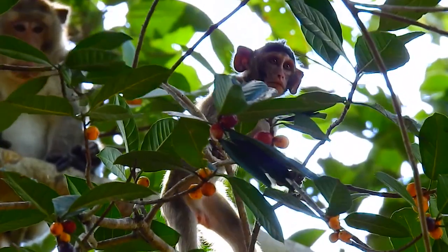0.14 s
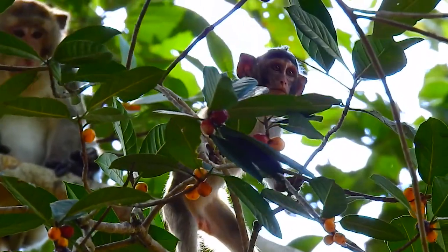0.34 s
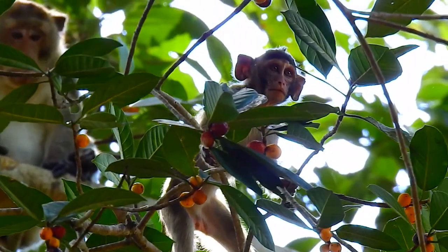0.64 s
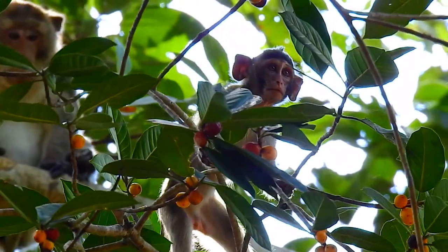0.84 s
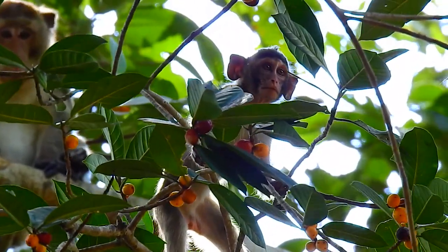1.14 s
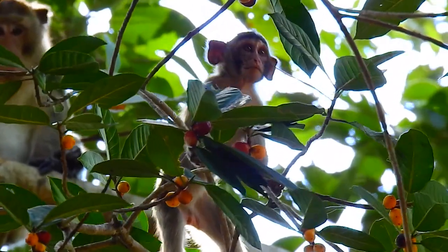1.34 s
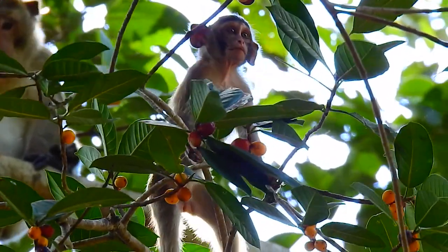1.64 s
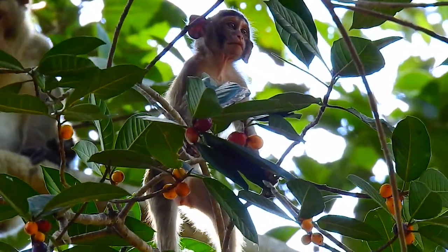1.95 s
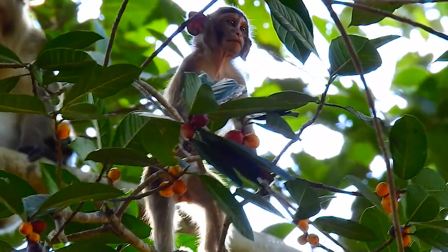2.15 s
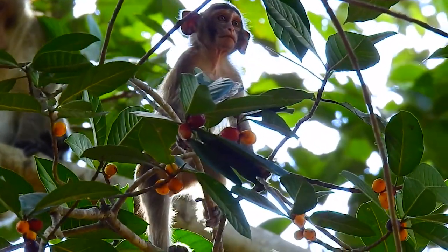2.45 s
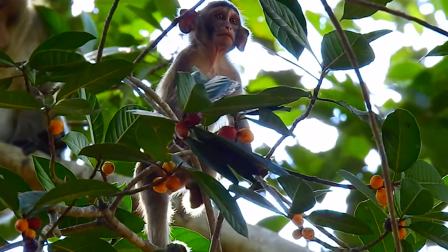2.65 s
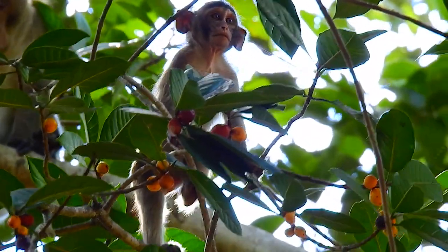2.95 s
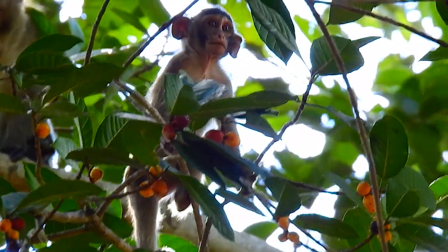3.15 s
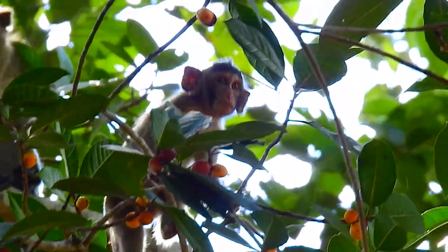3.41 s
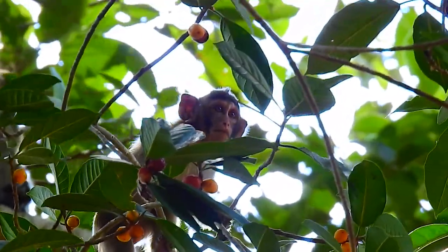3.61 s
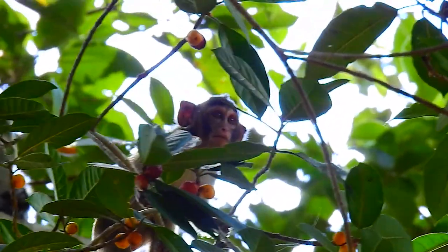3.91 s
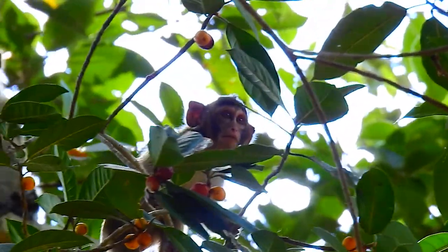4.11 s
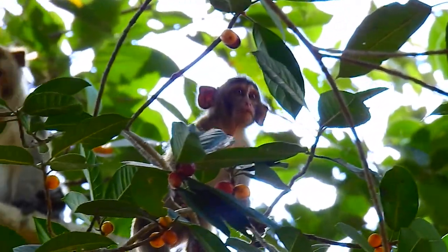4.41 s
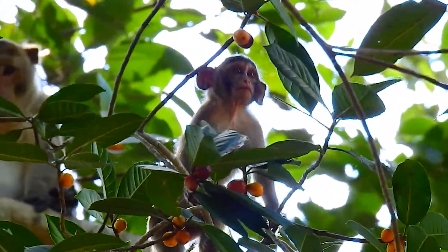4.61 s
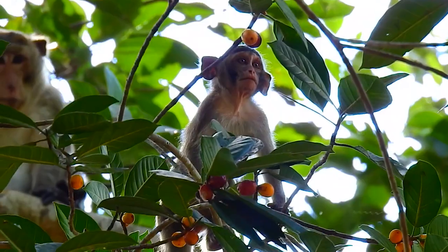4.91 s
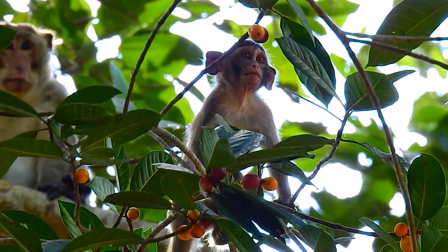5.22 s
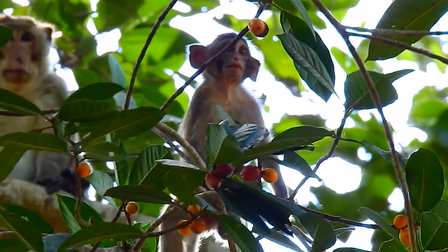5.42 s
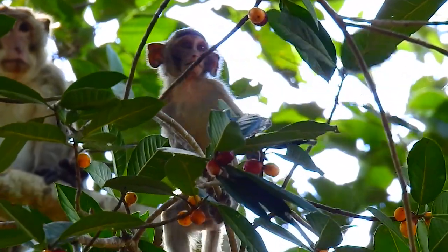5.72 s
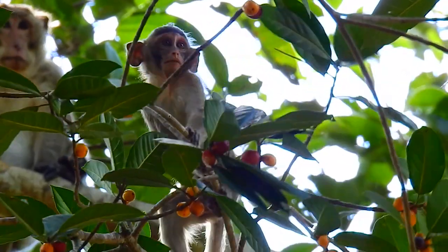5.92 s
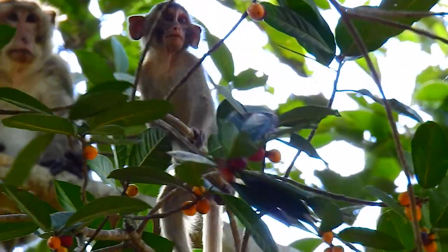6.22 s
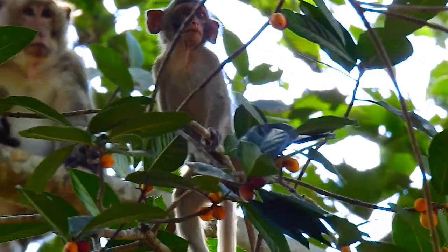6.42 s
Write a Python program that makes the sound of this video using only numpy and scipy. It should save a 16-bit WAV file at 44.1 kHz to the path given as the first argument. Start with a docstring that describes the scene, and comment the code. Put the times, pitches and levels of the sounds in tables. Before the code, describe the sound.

Several cicadas drone loudly and without pause in a forest, a shrill fluttering whine around seven to eight kilohertz, smeared by echoes and slightly left. Beneath lie a soft low rumble, leafy hiss and faint rustling. Small woody knocks scatter throughout, sharpest near two and a half seconds, with tiny falling insect chips, a few low thuds and one faint distant toot. Wide stereo outdoor pickup, with no voices.

```python
"""Four cicadas drone in a forest, loudest at the fifth harmonic of click rates near 1.5 kHz. Three warble
about 13 times a second, a fainter fourth at 19 as it swells; pitches climb and dense echoes smear the song.
Filtered noise makes the rumble, leafy hiss and soft rustling below; noise through a resonance makes a faint hum.
Gliding sines make thin insect chips and faint chirps; noise bursts set wood knocking and clicks set off low
thuds. One distant toot is a stack of harmonics."""
import sys
import numpy as np
from scipy import signal
from scipy.fft import rfft, irfft, next_fast_len
from scipy.io import wavfile

SR = 44100
rng = np.random.default_rng(int(sys.argv[2]) if len(sys.argv) > 2 else 0)


def dump_mix(stems):
    """Bounce the given channels to the path in sys.argv[1] as a 16-bit WAV at rate SR."""
    frames = np.atleast_2d(stems).T  # one column per channel
    limited = np.clip(frames, -1, 1)  # hard clip at full scale
    pcm = np.round(limited * 32767).astype(np.int16)
    wavfile.write(sys.argv[1], SR, pcm)


N = 289296  # length in samples

# Harmonics each cicada body radiates, relative levels: harmonic_number, level_db
NEAR_BODY = [(4, -19), (5, -1), (6, -32), (7, -45), (8, -50)]
LOWER_BODY = [(4, -27), (5, -1), (6, -32), (7, -54), (8, -35)]
FAR_BODY = [(4, -25), (5, 6), (6, -44), (7, -41)]
# Click rates of the near, lower, upper and swelling cicada: first_hz, climb_hz_per_s, slowing_hz_per_s2
CLICK_RATES = [(1485.5, 7.3, 0.19), (1427, 4.7, 0), (1516, 1.8, 0), (1497, 0.4, 0)]
# Loudness of two cicadas over time: time_s, level_db
NEAR_LEVEL = [(0, -23), (1.5, -23.5), (2, -22), (3, -25.5), (6.56, -24.5)]
UPPER_LEVEL = [(0, -32.5), (1, -33.5), (2, -31.5), (3, -36), (6, -36), (6.56, -26)]
LOWER_DB = -33
# The fourth cicada rises steadily, passing this level at this time
SWELL_TIME_S, SWELL_DB, SWELL_RISE_DB_PER_S = 2.23, -52.5, 5.0
LEAN_DB = 1.5  # cicadas, left minus right

# Relative noise colours of rumble, hiss and rustling: frequency_hz, density_db_per_hz
RUMBLE_COLOUR = [(12, -51), (20, -20), (46, -6), (69, 2.5), (128, -2), (186, -6), (259, -18.5),
                 (445, -21.5), (550, -24), (633, -19.5), (729, -26.5), (922, -22.5), (1340, -28.5),
                 (3960, -29), (5500, -25.5), (7150, -67), (12100, -120)]
HISS_COLOUR = [(4500, -30), (5600, -2), (6600, -1.5), (7900, -2), (8400, -15.5), (9000, 0.5), (10000, -4.5),
               (12000, -5), (13200, -9), (14300, -26)]
RUSTLE_COLOUR = [(180, -14), (300, -9.5), (600, 5.5), (1000, -4.5), (1600, -2), (2600, -28), (6000, -60)]
RUMBLE_DB, HISS_DB = -41, -51.5
# Stereo width of the noise: frequency_hz, side_minus_mid_db
NOISE_WIDTH = [(60, -16.5), (110, -15), (200, -8.5), (370, -7), (670, -8.5), (1230, -13), (2250, -11),
               (4120, -6), (7530, -0.5), (13800, 6.5)]
# Loudness of the rustling over time: time_s, level_db
RUSTLE_LEVEL = [(0, -54.5), (.3, -59.5), (1.2, -62), (1.7, -56.5), (2.6, -65), (3.8, -66), (4.3, -59),
                (5.1, -70), (5.55, -58), (6.2, -61), (6.56, -73)]

HUM_HZ, HUM_DB = 886, -65.5

# Falling insect chips, levels before echoes: time_s, level_db
CHIPS = [(0.0594, -38), (0.1894, -40), (0.6744, -46), (0.9707, -41), (1.0685, -44), (1.3119, -43),
         (1.5494, -39), (1.799, -44), (2.6155, -43), (2.819, -40), (3.3408, -45), (3.5617, -41),
         (3.7843, -44), (4.7366, -44), (5.2829, -41), (5.661, -42), (6.1861, -43)]
# Faint far chirps, levels before echoes: start_s, length_s, first_hz, last_hz, level_db
CHIRPS = [(1.485, .03, 3400, 3380, -53), (1.52, 0.028, 3380, 3480, -47.5), (3.61, 0.011, 3260, 2880, -44),
          (3.645, 0.028, 2960, 3160, -48), (3.897, 0.0089, 3200, 2900, -45)]

# Wooden knocks, last two relative to level_db: start_s, level_db, pitch_hz, crack_db, lowest_ring_db
KNOCKS = [(0.549, -42, 804, -6, -10), (0.764, -42.5, 960, -6, -16), (0.778, -41, 912, 2, -2),
          (0.829, -47, 880, 1, -13), (1.141, -41, 1046, 2, -11), (1.154, -45.5, 794, -6, -17),
          (1.293, -52, 1110, 1, 9), (1.318, -41, 814, -20, -14), (1.384, -47, 834, -5, -13),
          (1.788, -49.5, 870, 8, 3), (2.274, -38.5, 1357, 3.5, -22), (2.359, -46, 814, -11, -6),
          (2.438, -49, 723, -6, 5), (2.465, -27.5, 1047, -11, -20), (2.924, -43, 920, -11, -1),
          (3.232, -50, 1080, 7, -5), (4.239, -47, 877, 6, -5), (4.706, -40, 990, -22, 3),
          (4.941, -49.5, 1090, 8, -1), (5.48, -36, 1050, 3, -9), (5.587, -42, 873, -13, -15),
          (5.786, -48, 1040, 5, -9), (5.812, -38.5, 784, -3, -15), (5.832, -40, 700, -2, -22),
          (5.841, -42, 710, 0, -20), (6.159, -49.5, 1110, 9.5, 7)]
# Upper rings of the wood, relative to the knock: pitch_multiple, level_db, t60_s
WOOD_RINGS = [(1.002, 0.5, 0.076), (1.25, -8.5, 0.046), (2.05, -29, 0.035)]
# Lowest, hollow ring of the wood: pitch_multiple, t60_s
HOLLOW_RING = (0.584, 0.11)
CONTACT_RISE_S, BLOW_T60_S, CRACK_T60_S = 0.0035, 0.025, 0.077
# Low thuds: start_s, level_db, pitch_hz, t60_s
THUDS = [(1.419, -43, 202.7, 0.44), (2.923, -37, 207.6, 0.43), (4.705, -32, 199.8, 0.43)]

TOOT_S, TOOT_ATTACK_S, TOOT_HOLD_S = 2.35, 0.04, 0.17
TOOT_DB, TOOT_ROOT_DB, TOOT_FADE_DB_PER_S = -52, -4, 24  # root: its fundamental, relative
TOOT_HZ, TOOT_TAIL_HZ = 443, 446.5
# Its resonance: centre at first, centre in the tail, width
TOOT_LOUDEST_HZ, TOOT_TAIL_LOUDEST_HZ, TOOT_WIDTH_HZ = 3680, 3400, 480

CUTOFF_HZ = 14400


def from_db(db):
    """Turn decibels into an amplitude factor."""
    return 10 ** (np.asarray(db) / 20)


def rms_one(x):
    """Scale a signal to an RMS of 1."""
    return x / np.sqrt(np.mean(x ** 2) + 1e-20)


def level_over_time(rows):
    """Draw straight lines in dB between (time_s, level_db) points."""
    time_s, level_db = np.transpose(rows)
    return np.interp(np.arange(N) / SR, time_s, level_db)


def at_hz(points, hz):
    """Read a dB curve along a logarithmic frequency axis."""
    points = np.array(points)
    return np.interp(np.log(hz + 1), np.log(points[:, 0] + 1), points[:, 1])


def drift(rate_hz):
    """Slow random wander of RMS 1: noise through two equal low-pass poles, one value per 40 samples."""
    step = 40
    pole = np.exp(-2 * np.pi * rate_hz * step / SR)
    noise = rng.standard_normal(N // step + 2002)
    slow = signal.lfilter([1], [1, -2 * pole, pole ** 2], noise)[2000:]  # skip the filter's start-up
    return np.interp(np.arange(N) / step, np.arange(len(slow)), rms_one(slow))


def ring(excitation, hz, t60):
    """Two-pole resonance: a unit click starts a sine of height 1 that falls 60 dB in t60 seconds."""
    radius = from_db(-60 / (t60 * SR))
    angle = 2 * np.pi * hz / SR
    feedback = [1, -2 * radius * np.cos(angle), radius ** 2]
    return signal.lfilter([0, np.sin(angle)], feedback, excitation + 1e-18)


def harmonics(hz, body):
    """Sum sines at whole multiples of a moving pitch."""
    phase = 2 * np.pi * np.cumsum(hz) / SR
    return sum(from_db(db) * np.sin(round(number) * phase) for number, db in body)


def forest(x, direct_db, t60, alike, lag_s):
    """Direct sound plus dense decaying echoes, partly shared by both sides; expected power is kept."""
    t = np.arange(SR) / SR
    shared, left, right = rng.standard_normal((3, SR))
    alike = np.clip(alike, 0, 1)
    echoes = np.sqrt(alike) * shared + np.sqrt(1 - alike) * np.array([left, right])
    echoes *= from_db(-60 * t / t60)
    echoes /= np.sqrt(np.sum(echoes ** 2, axis=1, keepdims=True))
    echoes[:, 0] = from_db(direct_db)
    size = next_fast_len(len(x) + SR)
    hz = np.fft.rfftfreq(size, 1 / SR)
    # A positive lag delays left by half and advances right by half
    lag = np.exp(-1j * np.pi * hz * lag_s * np.array([[1], [-1]]))
    out = irfft(rfft(x, size) * rfft(echoes, size) * lag, size)
    return out[:, len(x) - N:len(x)] / np.sqrt(1 + from_db(2 * direct_db))


def cicada(hz, db, body, warble_hz, start, depth, skew, unsteady, **place):
    """Body harmonics of a click rate that warbles to and fro and wanders slightly."""
    warble_rate = warble_hz * (1 + unsteady * drift(1.456))
    phase = 2 * np.pi * (start + np.cumsum(warble_rate) / SR)
    warble = np.sin(phase) + skew * np.sin(2 * phase)
    hz = hz * (1 + depth * warble + 0.000308 * drift(6.8))
    # Six earlier warbles fill the forest with echoes before the scene opens
    earlier = round(6 * SR / warble_hz)
    tone = rms_one(harmonics(np.r_[hz[:earlier], hz], body))
    return from_db(db) * forest(tone, **place)


def chorus():
    """Four cicadas with their own echo blends, leaning left; all climb in pitch and the fourth swells."""
    t = np.arange(N) / SR
    near_hz, lower_hz, upper_hz, swelling_hz = [
        first + climb * t - slowing * t ** 2 for first, climb, slowing in CLICK_RATES]
    swelling_db = SWELL_DB + SWELL_RISE_DB_PER_S * (t - SWELL_TIME_S)
    near = cicada(near_hz, level_over_time(NEAR_LEVEL), NEAR_BODY,
                  warble_hz=12.7, start=0.284, depth=0.0064, skew=0.17, unsteady=0.021,
                  direct_db=-6.0, t60=1.0, alike=0.067, lag_s=1.2e-5)
    lower = cicada(lower_hz, LOWER_DB, LOWER_BODY,
                   warble_hz=12.6, start=0.282, depth=0.0075, skew=0.34, unsteady=0.0343,
                   direct_db=-8.5, t60=1.0, alike=0.078, lag_s=-2.4e-5)
    upper = cicada(upper_hz, level_over_time(UPPER_LEVEL), FAR_BODY,
                   warble_hz=12.2, start=0.591, depth=0.0053, skew=0.031, unsteady=0.033,
                   direct_db=-5.5, t60=1.0, alike=0.035, lag_s=0)
    swelling = cicada(swelling_hz, swelling_db, FAR_BODY,
                      warble_hz=19.0, start=0.1, depth=0.0067, skew=0.11, unsteady=0.0264,
                      direct_db=-36, t60=0.44, alike=0.043, lag_s=0)
    lean = from_db(LEAN_DB / 2 * np.array([[1], [-1]]))
    return (near + lower + upper + swelling) * lean


def air(colour, patchy_db):
    """Coloured stereo noise whose half-octave bands swell and sink, partly together."""
    hz = np.fft.rfftfreq(N, 1 / SR)
    mid, side = rfft(rng.standard_normal((2, N))) * from_db(at_hz(colour, hz))
    side = side * from_db(at_hz(NOISE_WIDTH, hz))
    pair = np.array([mid + side, mid - side])
    band_place = 2 * np.log2((hz + 1) / 20)
    together = drift(6)
    out = 0
    for band in range(20):
        share = np.clip(1 - abs(band_place - band), 0, 1)  # neighbours crossfade
        swell_db = patchy_db * (0.71 * together + drift(11.5))
        out = out + irfft(pair * share, N) * from_db(swell_db)
    return out / np.sqrt(np.mean(out.mean(axis=0) ** 2))


def rumble():
    """Far, low-weighted noise, leaning slightly left."""
    return from_db(RUMBLE_DB) * air(RUMBLE_COLOUR, patchy_db=1.62) * from_db([[0.4], [-0.4]])


def hiss():
    """Leafy treble noise with gently shifting bands."""
    return from_db(HISS_DB) * air(HISS_COLOUR, patchy_db=0.65)


def rustling():
    """Soft midrange noise that rises and falls along a drawn level."""
    return from_db(level_over_time(RUSTLE_LEVEL)) * air(RUSTLE_COLOUR, patchy_db=1.8)


def hum():
    """Noise through one narrow resonance, coming and going."""
    swell_db = 3.5 * drift(8.0)
    return from_db(HUM_DB + swell_db) * rms_one(ring(rng.standard_normal(N), HUM_HZ, t60=0.23))


def sweeps(rows):
    """Short gliding sines with soft ends."""
    out = np.zeros(N)
    for start_s, length_s, first_hz, last_hz, db in rows:
        at, size = round(start_s * SR), round(length_s * SR)
        hz = np.linspace(first_hz, last_hz, size)
        glide = np.sin(2 * np.pi * np.cumsum(hz) / SR)
        out[at:at + size] += from_db(db) * np.hanning(size) * glide
    return out


def chips_and_chirps():
    """Identical falling chips and individually gliding far chirps, all with echoes."""
    # Each chip starts 3 ms ahead of its listed time
    calls = [(time_s - 0.003, 0.011, 6100, 4800, db) for time_s, db in CHIPS]
    calls += list(CHIRPS)
    return forest(sweeps(calls), direct_db=0, t60=0.13, alike=0.6, lag_s=0)


def knock(db, hz, crack_db, hollow_db, noise):
    """A short noise blow rings the wood's modes, with a broad noise crack on top."""
    t = np.arange(len(noise)) / SR
    noise = noise * np.minimum(t / CONTACT_RISE_S, 1)
    blow = noise * from_db(-60 * t / BLOW_T60_S)
    crack_band = signal.butter(2, [0.45 * hz, 2.1 * hz], "band", fs=SR, output="sos")
    crack = signal.sosfilt(crack_band, noise * from_db(-60 * t / CRACK_T60_S))
    parts = [(ring(blow, multiple * hz, t60), ring_db) for multiple, ring_db, t60 in WOOD_RINGS]
    hollow_multiple, hollow_t60 = HOLLOW_RING
    parts.append((ring(blow, hollow_multiple * hz, hollow_t60), hollow_db))
    parts.append((crack, crack_db))
    return sum(from_db(db + part_db) * part / abs(part).max() for part, part_db in parts)


def knocks():
    """Place every wooden knock, each struck by its own noise."""
    size = 6000  # samples per knock
    out = np.zeros(N + size)
    for start_s, db, hz, crack_db, hollow_db in KNOCKS:
        at = round(start_s * SR)
        out[at:at + size] += knock(db, hz, crack_db, hollow_db, rng.standard_normal(size))
    return out[:N]


def thuds():
    """Single clicks set low resonances ringing longer than the knocks."""
    out = np.zeros(N)
    for start_s, db, hz, t60 in THUDS:
        click = np.zeros(N)
        click[round(start_s * SR)] = from_db(db)
        out += ring(click, hz, t60)
    return out


def toot():
    """A far buzzy tone holds, steps up and fades; its fundamental and harmonics near a resonance carry."""
    t = np.arange(N) / SR - TOOT_S
    after = t - TOOT_ATTACK_S - TOOT_HOLD_S
    attack = np.clip(t / TOOT_ATTACK_S, 0, 1) ** 2
    level = attack * from_db(TOOT_DB - TOOT_FADE_DB_PER_S * np.maximum(after, 0))
    tail = np.clip(after / TOOT_ATTACK_S, 0, 1)
    hz = TOOT_HZ + (TOOT_TAIL_HZ - TOOT_HZ) * tail
    hz = hz * (1 + 0.004 * drift(30))
    loudest_hz = TOOT_LOUDEST_HZ + (TOOT_TAIL_LOUDEST_HZ - TOOT_LOUDEST_HZ) * tail
    body = [(1, TOOT_ROOT_DB)]
    for number in range(6, 11):
        resonance_db = -5 * ((number * hz - loudest_hz) / TOOT_WIDTH_HZ) ** 2
        body.append((number, resonance_db + 4.5 * drift(45)))
    return forest(level * harmonics(hz, body), direct_db=-1, t60=0.4, alike=0.7, lag_s=0)


def scene():
    """Layer the cicadas, the noise bed and the small sounds."""
    bed = rumble() + hiss() + rustling() + hum()
    return chorus() + bed + chips_and_chirps() + knocks() + thuds() + toot()


def record(dry):
    """The microphone drops the deepest bass; a steep low-pass cuts the top."""
    bass_cut = signal.butter(2, 32, "high", fs=SR, output="sos")
    top_cut = signal.ellip(10, 0.5, 70, CUTOFF_HZ, fs=SR, output="sos")
    return signal.sosfilt(top_cut, signal.sosfilt(bass_cut, dry))


dry = scene()
out = record(dry)
dump_mix(out)
```